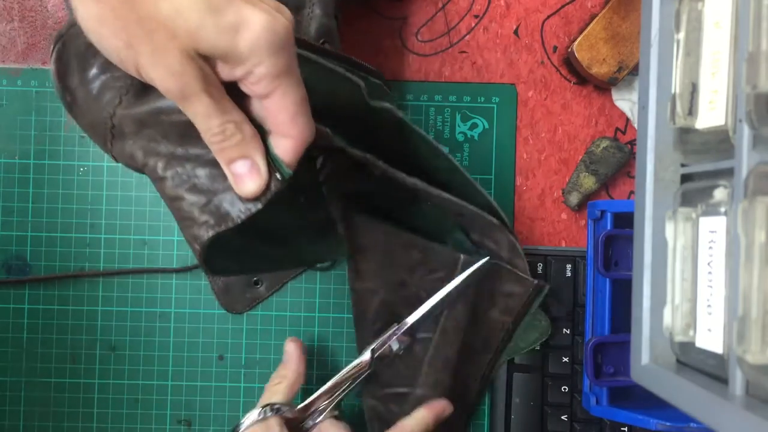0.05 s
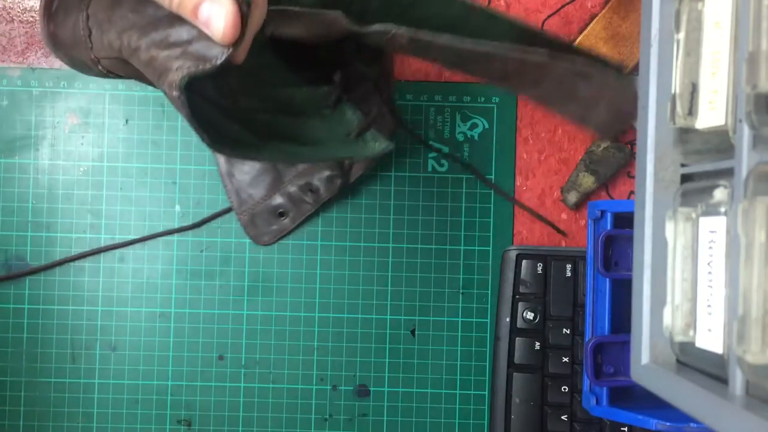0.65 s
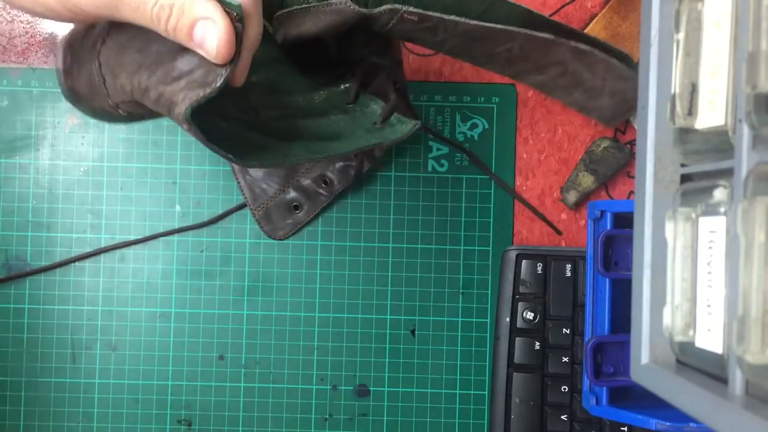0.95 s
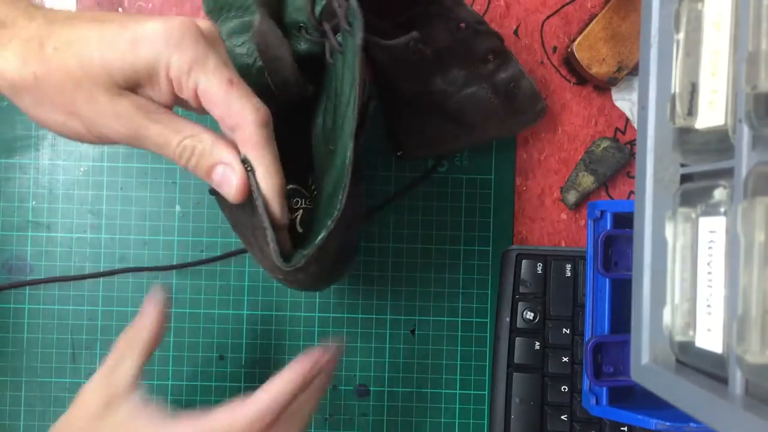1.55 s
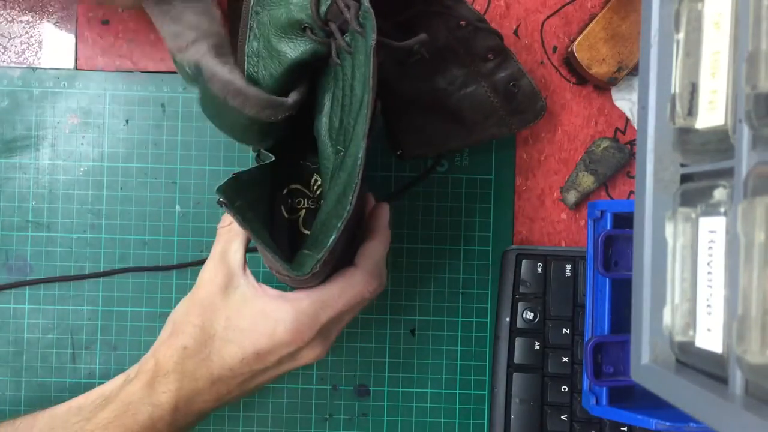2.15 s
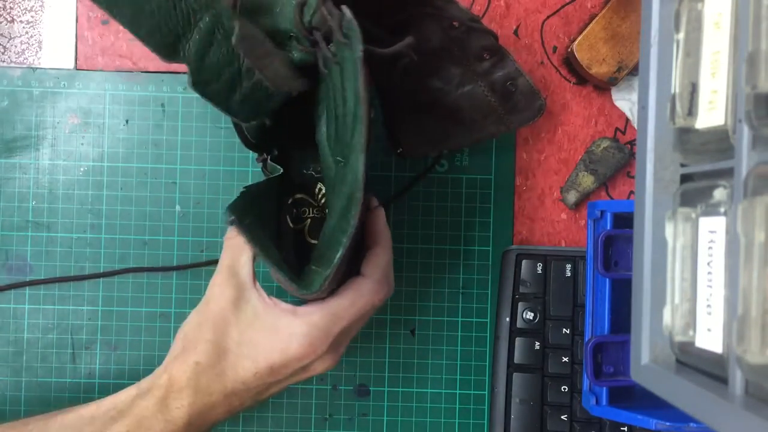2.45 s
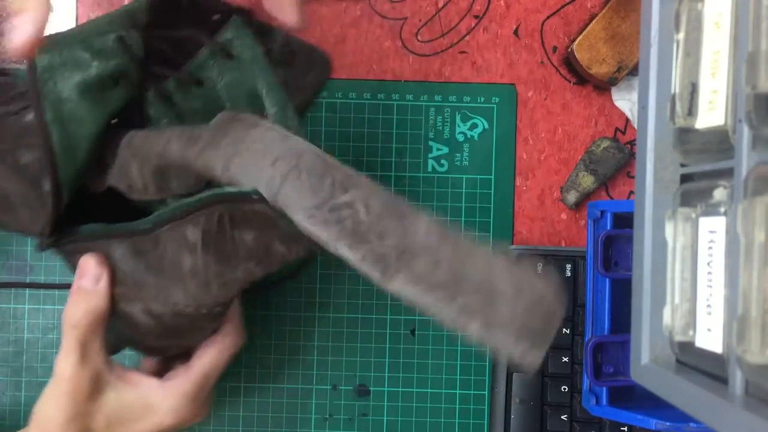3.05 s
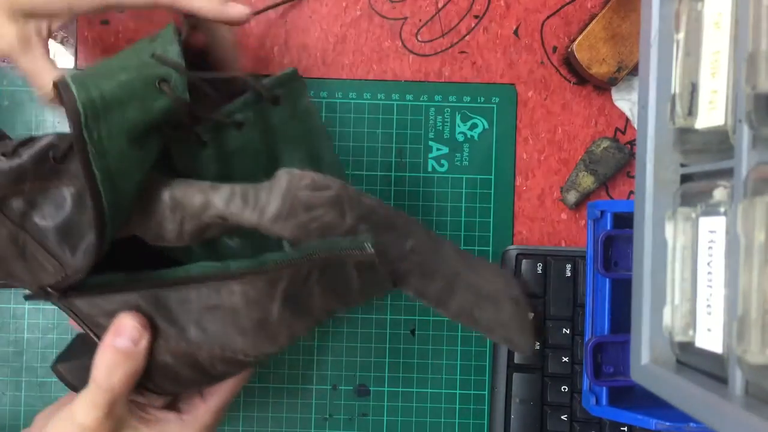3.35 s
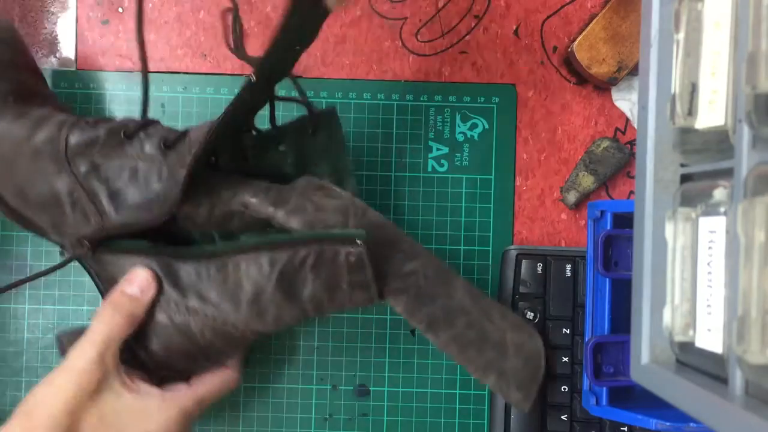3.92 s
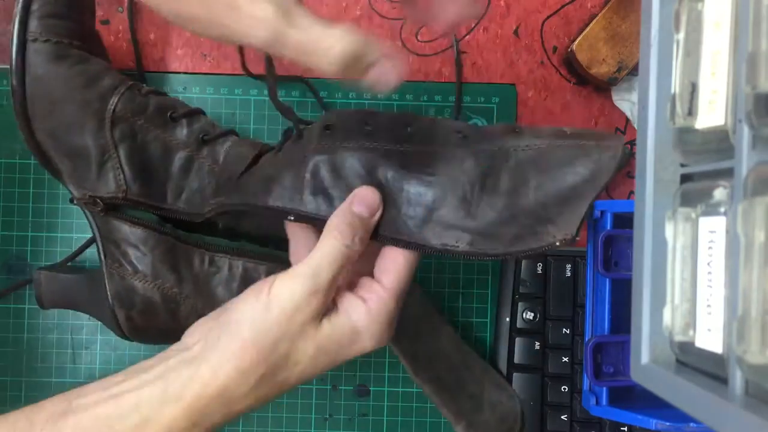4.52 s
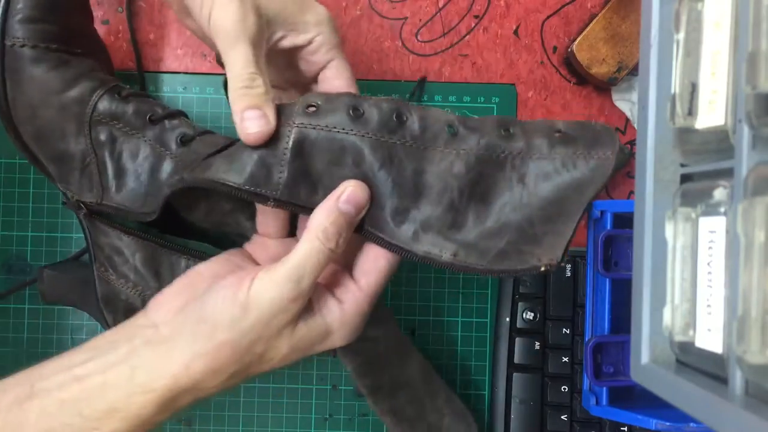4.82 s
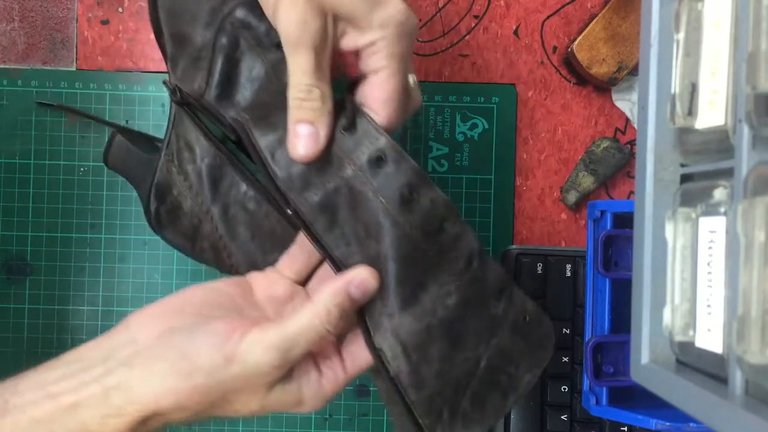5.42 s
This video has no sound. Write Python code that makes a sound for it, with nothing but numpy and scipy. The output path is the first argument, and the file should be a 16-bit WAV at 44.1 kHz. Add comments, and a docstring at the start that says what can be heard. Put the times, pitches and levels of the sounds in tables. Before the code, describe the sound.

Scissors finish a cut through boot leather with short hissing strokes and a small metallic clink, then are put down on a workbench with a few knocks. The boot is turned, its leather rubbing and creaking softly, the zip faintly clinking. It drops over in a cluster of heavy thuds that leave the bench booming, followed by more rubs and duller bumps. A low hum fills the room, and everything sounds close.

```python
"""Over the low hum of the room, scissors finish a cut in boot leather, then clink down on a repair bench
(1.2 s). The boot is turned: its hide rubs, hisses and creaks, and the zip's slider clinks faintly.
At 4 s it drops over in a cluster of heavy thuds. Like every blow here, each sends a bending wave through
the bench top, treble first and bass last, and leaves the bench booming. The boot is then handled,
with a few more rubs and duller bumps."""
import sys
import numpy as np
from scipy import signal
from scipy.fft import rfft, irfft
from scipy.io import wavfile
from scipy.ndimage import uniform_filter1d

SR = 44100
rng = np.random.default_rng(int(sys.argv[2]) if len(sys.argv) > 2 else 0)


def store_pcm(level_fs):
    """Save levels as 16-bit WAV."""
    pcm = np.round(np.clip(level_fs, -1, 1) * 32767).astype(np.int16)
    wavfile.write(sys.argv[1], SR, np.atleast_2d(pcm).T)


N = 250488
SIZE = 32768  # samples in a one-shot
AGE, FREQS = np.arange(SIZE) / SR, np.fft.rfftfreq(SIZE, 1 / SR)  # its time and frequency axes

# EQ of the room tone: f/Hz, level/dB
ROOM_EQ = [(20, -17), (45, -17.5), (75, -19.5), (110, -2), (190, -14), (270, -9), (420, -33), (600, -25.5),
           (800, -33), (1700, -25.5), (3300, -46.5), (5500, -45.5), (8000, -52.5), (16000, -60)]
# resonances in the hum: f/Hz, width/Hz, boost/dB
HUM_PEAKS = [(111, 28, 6), (535, 47, 11.5), (669.8, 26, 12), (1030.6, 79, 13.5), (1646, 43, 11.5)]
# EQ of the bench's rumble: f/Hz, level/dB
RUMBLE_EQ = [(20, -53), (36, 15.5), (50, 1.5), (80, 6), (120, 6.5), (170, -9.5), (280, -7.5), (400, -23.5),
             (700, -61)]
# booming low modes of the bench: f/Hz, level/dB, t60/s
BENCH_MODES = [(48.4, 0, 2.24), (57.46, 7, 1.2), (64.8, 27, 0.22), (75.9, 9.5, 0.89), (98, -2, 0.1),
               (118.4, -6, 0.27), (155.3, 29, 0.2)]
# leather sliding and flexing: peak t/s, length/s, rub level/dB, hiss level/dB, hiss centre f/Hz
STROKES = [(0.194, 0.13, -50.5, -68.5, 4470), (0.41, 0.26, -56, -68.5, 5300),
           (0.638, .045, -46.5, -60, 4460), (0.779, 0.075, -50, -56.5, 4470),
           (0.878, 0.034, -53.5, -48, 4260), (0.955, .07, -44, -54, 4300), (1.87, 0.13, -53.5, -71, 5000),
           (1.941, 0.013, -50, -78, 4950), (2.4273, 0.01, -50, -52.5, 4970),
           (2.671, 0.039, -45.5, -67, 6300), (2.797, 0.13, -50.5, -58.5, 6700),
           (2.951, 0.095, -54.5, -64.5, 8200), (3.685, 0.023, -52, -81, 5000),
           (3.885, 0.011, -48.5, -50.5, 4970), (3.94, 0.1, -74, -68, 6500),
           (4.856, 0.075, -57, -67.5, 6100), (5.171, 0.026, -40, -57, 4500), (5.286, 0.1, -54.5, -71, 5100)]
# EQs of the leather's dull rub and bright hiss: f/Hz, level/dB
RUB_EQ = [(150, -25), (600, -4.5), (780, -2.5), (1050, 5), (1300, -3.5), (1600, 5.5), (2300, -3.5),
          (3100, -22.5), (6000, -51), (12000, -49)]
HISS_EQ = [(1500, 26.5), (3100, -15), (4400, -7.5), (6500, -5.5), (8000, -15), (9600, -9), (10700, -36),
           (13000, -13), (16000, -18)]
# bright ticks of blade tip, eyelets and zip: t/s, level/dB
TICKS = [(0.1945, -64), (0.7563, -60.5), (1.2304, -53.5), (1.4025, -66), (4.0191, -63), (4.168, -68),
         (4.2281, -59), (4.3463, -60)]
# ring of those small parts: f/Hz, level/dB, t60/s
TICK_MODES = [(8500, -3, .03), (9400, 0, .045), (13100, -5, .02), (13900, -5, .02)]
# EQ of a tick's attack: f/Hz, level/dB
TICK_EQ = [(3500, -30), (6500, -7), (7400, -15), (8300, -11), (9400, -7.5), (10800, -17), (13200, -19),
           (16000, -19)]
# blows on the bench: t/s, thud level/dB, soft-contact cutoff f/Hz, slap level/dB, slap centre f/Hz
KNOCKS = [(0.607, -43.5, 240, -50, 1700), (0.649, -58, 239, -52, 1750), (0.9467, -35, 247, -41, 1620),
          (0.9886, -39.5, 222, -43.5, 1600), (1.2304, -21, 325, -34, 1800), (1.2678, -34, 283, -43.5, 1680),
          (1.282, -33.5, 380, -44.5, 1450), (1.4014, -28.5, 300, -38, 1620),
          (1.4229, -30.5, 304, -45.5, 1500), (3.0165, -40.5, 220, -46, 1050), (3.5808, -63, 300, -53, 630),
          (4.019, -13.5, 240, -31.5, 1570), (4.1374, -17.5, 205, -32, 1500), (4.166, -32, 169, -49.5, 1350),
          (4.2276, -11.5, 222, -32.5, 1010), (4.25, -19.5, 183, -44.5, 1400),
          (4.4122, -66, 150, -56.5, 1520), (4.6339, -30.5, 107, -52.5, 1200), (5.161, -38, 108, -53, 1090),
          (5.461, -22.5, 129, -41.5, 800)]
# EQs of a blow's low thud and mid slap, and of a hard contact's crack: f/Hz, level/dB
THUD_EQ = [(25, -28), (45, 5.5), (75, 1), (120, 6.5), (230, 2), (340, -2), (420, -10.5), (500, 1),
           (750, -13.5), (1100, -22), (2000, -30), (4000, -31)]
SLAP_EQ = [(200, -50), (550, 6), (740, -0.5), (930, 3), (1200, -3), (1500, 2), (2100, -3.5), (2700, -7),
           (3150, -12.5), (4200, -14), (8000, -61)]
CRACK_EQ = [(1500, -61), (2800, -26), (3150, -18), (3550, 2.5), (5000, 10), (6500, 4.5), (8000, -8.5),
            (9500, -9), (11000, -24), (16000, -25)]
# waves bouncing off the bench's edges: length/direct path, level/dB
EDGE_ECHOES = [(1.702, -8.5), (2.8, -9)]
# hollow midrange of the bench top: f/Hz, level/dB, t60/s
HOLLOW_MODES = [(203.3, 4, 0.12), (309, 18.5, 0.023), (349.6, 1.5, 0.096), (478, -6, 0.073),
                (523, -19, 0.28), (592.5, -13, 0.17)]
# clinks of the scissors and the zip's slider: t/s, level/dB
CLINKS = [(0.7558, -43), (1.2304, -67), (1.2673, -52), (1.4025, -48.5), (2.4257, -66), (3.8809, -70)]
# ring of their steel: f/Hz, level/dB, t60/s
STEEL_MODES = [(2750, -12, .09), (4460, -5, .06), (4750, 3, .07), (4955, -2, .1), (5550, -8, .05),
               (5900, -6, .05), (6350, -7, .05), (7400, -14, .08)]
# reverb time of bench and room: f/Hz, t60/s
REVERB_TIMES = [(50, 0.89), (120, 0.15), (300, 0.36), (1000, 0.16), (3000, 0.14), (12000, 0.14)]


def amp(db):
    """Decibels to gain."""
    return 10 ** (np.asarray(db) / 20)


def steady(x):
    """Scales a sustained sound to rms 1."""
    return x / np.sqrt(np.mean(x ** 2) + 1e-30)


def brief(x):
    """Scales a one-shot to the energy of 20 ms at rms 1."""
    return x / np.sqrt(np.sum(x ** 2) / (.02 * SR) + 1e-30)


def curve(points, hz=FREQS):
    """Joins (f/Hz, value) breakpoints on a log-frequency axis."""
    f, value = np.transpose(points)
    return np.interp(np.log(hz + 1), np.log(f + 1), value)


def hump(hz, octaves):
    """A broad EQ bell in dB, 6 dB down this many octaves from hz."""
    return -6 * np.minimum((np.log2((FREQS + 1) / hz) / octaves) ** 2, 5)


def add(mix, s, sound):
    """Mixes a sound in at time s."""
    part = mix[max(round(s * SR), 0):][:len(sound)]
    part += sound[:len(part)]


def causal(db):
    """The minimum-phase response of an EQ curve: no pre-ring."""
    log_gain = np.log(amp(np.r_[db, db[-2:0:-1]]))
    return np.exp(np.conj(signal.hilbert(log_gain)))[:len(db)]


def noise_bed(eq_db):
    """Scene-long noise through an EQ curve, at rms 1."""
    impulse = irfft(causal(eq_db))[:SIZE // 4]
    return steady(signal.fftconvolve(rng.standard_normal(N), impulse)[:N])


def ring(modes):
    """Damped modes struck at time zero."""
    return sum(amp(db - 60 * AGE / t60) * np.sin(2 * np.pi * hz * AGE) for hz, db, t60 in modes)


def attack(rise_s):
    """An exponential fade-in."""
    return 1 - np.exp(-AGE / rise_s)


def hum(level_db=-48):
    """Room tone: steady fan-like noise with a few resonances."""
    peaks_db = sum(db / (1 + (2 * (FREQS - hz) / width) ** 2) for hz, width, db in HUM_PEAKS)
    return amp(level_db) * noise_bed(curve(ROOM_EQ) + peaks_db)


def swell(s, length_s, rise_share=0.6, roundness=1.1):
    """Start time and speed envelope of a stroke that peaks at s."""
    start = max(s - AGE[-1] / 2, 0)
    t = start + AGE - s
    slope_s = length_s * np.where(t < 0, rise_share, 1 - rise_share)
    return start, np.exp(-abs(t / slope_s) ** roundness)


def bench_rumble(hold_db=-49.5, push_db=-1.5, boom_db=-2):
    """The bench rumbles and booms under the held boot, and more when a stroke pushes on it."""
    push = np.full(N, amp(hold_db))
    for s, length_s, rub_db, _, _ in STROKES:
        start, speed = swell(s, length_s)
        add(push, start, amp(rub_db + push_db) * speed)
    rumble = push * noise_bed(curve(RUMBLE_EQ))
    modes = ring(BENCH_MODES)
    boom = signal.fftconvolve(push * rng.standard_normal(N), modes / np.linalg.norm(modes))[:N]
    return (rumble + amp(boom_db) * boom) / np.hypot(1, amp(boom_db))


def slips(per_s, spread_db, smooth):
    """Friction grain: tiny slips of uneven size over a smooth rubbing noise."""
    size = amp(spread_db * np.minimum(rng.exponential(1, SIZE), 4)) * rng.choice([-1, 1], SIZE)
    grains = size * (rng.random(SIZE) < per_s / SR)
    return steady(grains) + smooth * rng.standard_normal(SIZE)


def rub(creak_hz=1540, half_width_hz=130):
    """Flexing hide gives a dull rub that creaks in a narrow band."""
    creak_db = 7 / (1 + ((FREQS - creak_hz) / half_width_hz) ** 2)
    friction = slips(per_s=500, spread_db=2.5, smooth=0.54)
    return steady(irfft(rfft(friction) * amp(curve(RUB_EQ) + creak_db)))


def leather(clump_db=2.0):
    """Strokes swell and fade: the hide creaks as it flexes, its sliding surface hisses in clumps."""
    out = np.zeros(N)
    for s, length_s, rub_db, hiss_db, hiss_hz in STROKES:
        start, speed = swell(s, length_s)
        grip = amp(clump_db * steady(uniform_filter1d(rng.standard_normal(SIZE), size=250)))
        friction = grip * slips(per_s=1400, spread_db=3.5, smooth=0.85)
        hiss = irfft(rfft(friction) * amp(curve(HISS_EQ) + hump(hiss_hz, octaves=0.68)))
        add(out, start, speed * (amp(rub_db) * rub() + amp(hiss_db) * steady(hiss)))
    return out


def creaks(per_s=4, length_s=0.034, range_db=(-61, -51)):
    """The held boot gives faint short creaks at random moments."""
    out = np.zeros(N)
    for s in rng.uniform(0, N / SR, round(per_s * N / SR)):
        start, speed = swell(s, length_s)
        add(out, start, amp(rng.uniform(*range_db)) * speed * rub())
    return out


def burst(eq_db, decay_s, rise_s):
    """An unpitched transient: a quick scatter of tiny contacts, whitened, then shaped by an EQ."""
    envelope = np.exp(-AGE / decay_s) * attack(rise_s)
    spectrum = rfft(rng.standard_normal(SIZE) * envelope)
    white = irfft(spectrum / (abs(spectrum) + 1e-12))
    return brief(irfft(rfft(white * np.sqrt(envelope)) * causal(eq_db)))


def metal(events, modes, click_eq, ring_db, click_db):
    """Metal parts chatter briefly as they touch, and ring."""
    out = np.zeros(N)
    ringing = brief(ring(modes) * attack(0.00067))
    for s, db in events:
        click = burst(curve(click_eq), decay_s=.0045, rise_s=.0012)
        add(out, s, amp(db + ring_db) * ringing + amp(db + click_db) * click)
    return out


def tail(build_s):
    """A diffuse reverb tail of energy 1; the bass lasts longest."""
    hz, t, noise = signal.stft(rng.standard_normal(SIZE), SR, nperseg=512)
    decay = amp(-60 * t / curve(REVERB_TIMES, hz)[:, None])
    wash = signal.istft(noise * decay, SR, nperseg=512)[1][:SIZE] * attack(build_s)
    return wash / np.linalg.norm(wash)


def thud(soft_hz, travel_s=0.02118, dispersion=1.53, boom_db=-7, diffuse_db=-15):
    """Higher bending waves cross the bench top sooner, so the thud falls in pitch; then the bench booms."""
    # the crossing takes travel_s at 100 Hz and scales as ratio ** dispersion
    ratio, power = 100 / np.maximum(FREQS, 20), dispersion - 1
    phase = 2 * np.pi * 100 * travel_s * (ratio ** power - 1) / power
    arrivals = np.exp(1j * phase) + sum(amp(db) * np.exp(1j * phase * path) for path, db in EDGE_ECHOES)
    tone = amp(curve(THUD_EQ)) / np.sqrt(1 + (FREQS / soft_hz) ** 4)  # a soft contact dulls it
    fade_out = np.clip(2 - 3 * AGE / AGE[-1], 0, 1)
    wave = brief(irfft(tone * arrivals) * fade_out)
    boom = brief(ring(BENCH_MODES) * attack(0.1))
    diffuse = brief(signal.fftconvolve(wave, tail(build_s=0.0069))[:SIZE])
    return brief(wave + amp(boom_db) * boom + amp(diffuse_db) * diffuse)


def knocks(hard_hz=314, bright_hz=1583):
    """Each blow thuds and rings through the bench, and slaps and cracks through the air."""
    thuds, slaps = np.zeros(N), np.zeros(N)
    hollow = brief(ring(HOLLOW_MODES) * attack(0.011))
    for s, thud_db, soft_hz, slap_db, slap_hz in KNOCKS:
        hollow_db = -5 + 22.5 * min(np.log2(soft_hz / hard_hz), 0)  # harder hits ring more, up to a limit
        crack_db = -16.5 + 27.5 * np.log2(slap_hz / bright_hz)  # brighter slaps carry more crack
        slap = burst(curve(SLAP_EQ) + hump(slap_hz, octaves=0.86), decay_s=0.0056, rise_s=0.00012)
        crack = burst(curve(CRACK_EQ), decay_s=0.0044, rise_s=0.00054)
        add(thuds, s, amp(thud_db) * (thud(soft_hz) + amp(hollow_db) * hollow))
        add(slaps, s, amp(slap_db) * (slap + amp(crack_db) * crack))
    return thuds, slaps


def scene(room_db=-9):
    """The mono mix: airborne sounds feed a short room reverb; thuds and rumble come through the bench."""
    thuds, slaps = knocks()
    clinks = metal(CLINKS, STEEL_MODES, CRACK_EQ, ring_db=-5, click_db=-6)
    ticks = metal(TICKS, TICK_MODES, TICK_EQ, ring_db=-12, click_db=-3)
    airborne = leather() + creaks() + ticks + slaps + clinks
    room = signal.fftconvolve(airborne, tail(build_s=0.0014))[:N]
    return (hum() + bench_rumble() + airborne + thuds + amp(room_db) * room)[None]


def record(dry, low_cut_hz=38, high_cut_hz=15750):
    """The microphone drops the deepest bass; a steep high cut trims the top."""
    low_cut = signal.butter(8, low_cut_hz, "high", fs=SR, output="sos")
    high_cut = signal.firwin(511, high_cut_hz, window=("kaiser", 9), fs=SR)
    return signal.oaconvolve(signal.sosfilt(low_cut, dry), high_cut[None], "same")


dry = scene()
out = record(dry)
store_pcm(out)
```